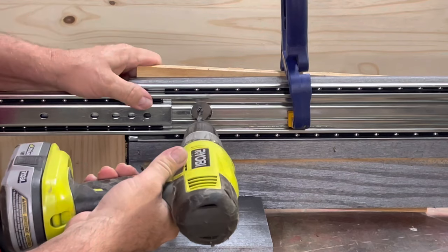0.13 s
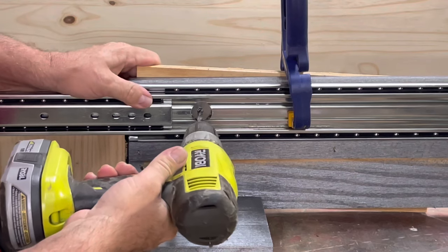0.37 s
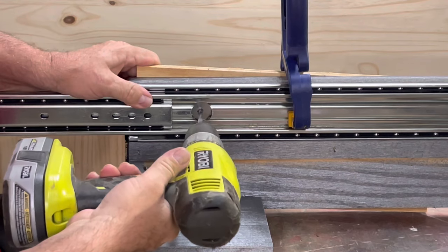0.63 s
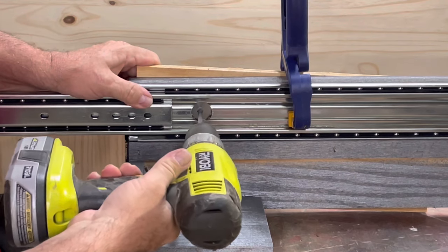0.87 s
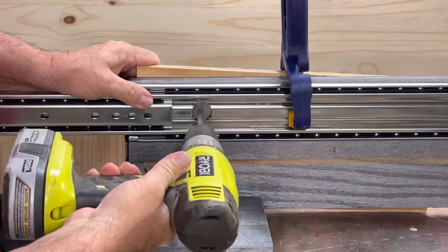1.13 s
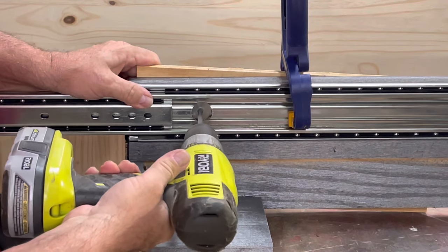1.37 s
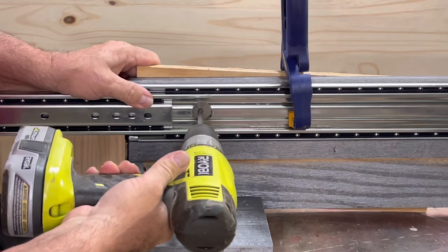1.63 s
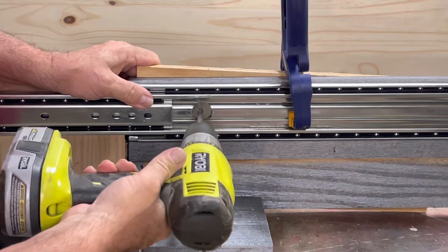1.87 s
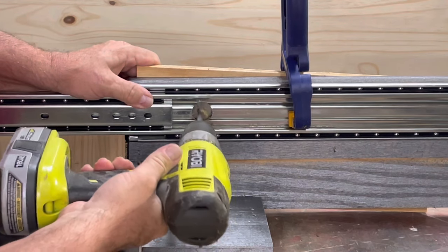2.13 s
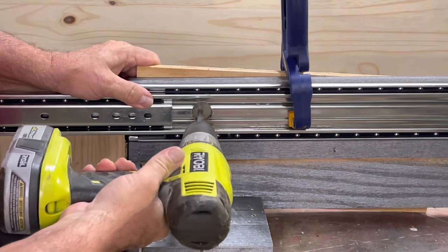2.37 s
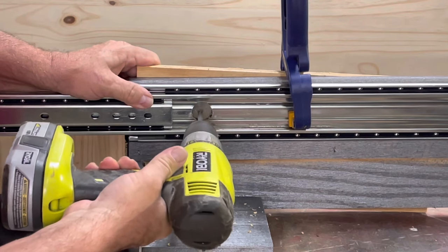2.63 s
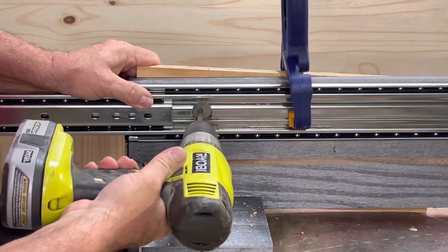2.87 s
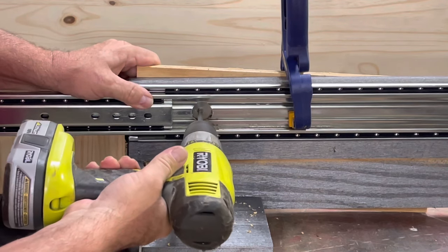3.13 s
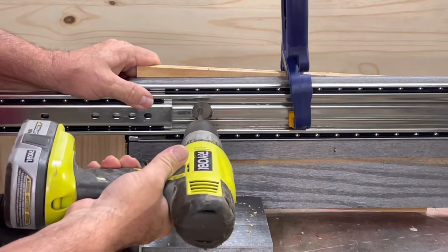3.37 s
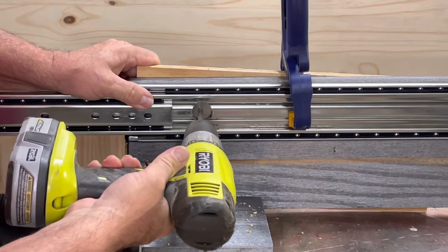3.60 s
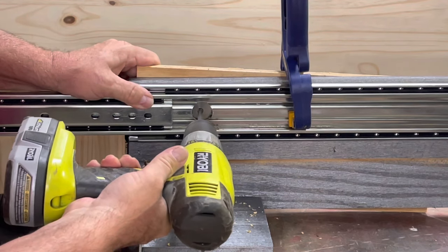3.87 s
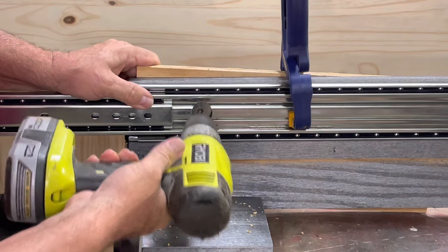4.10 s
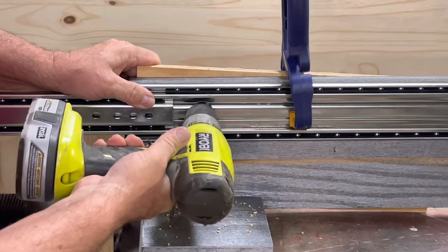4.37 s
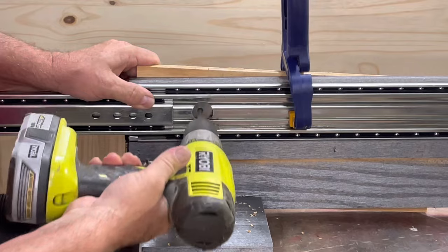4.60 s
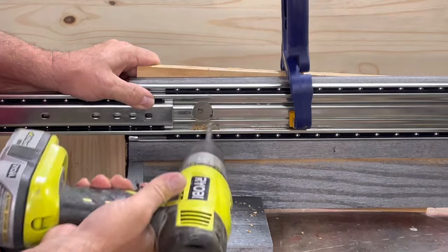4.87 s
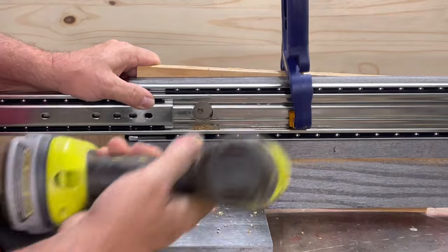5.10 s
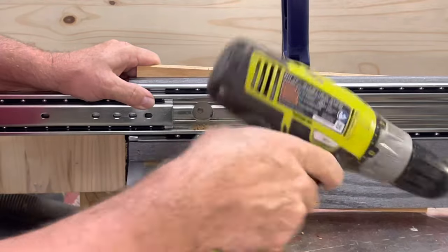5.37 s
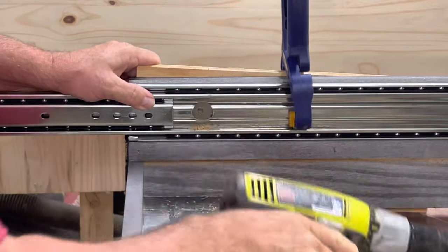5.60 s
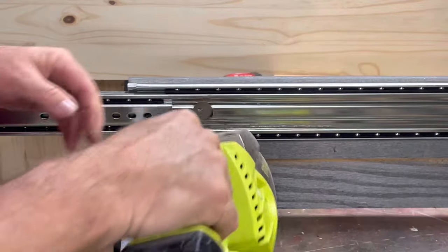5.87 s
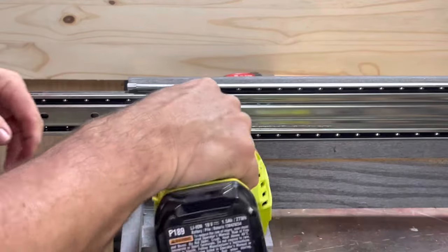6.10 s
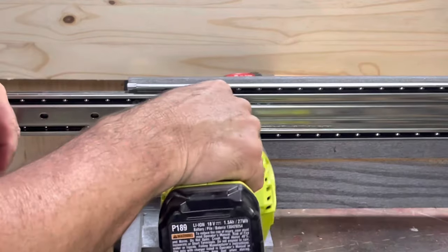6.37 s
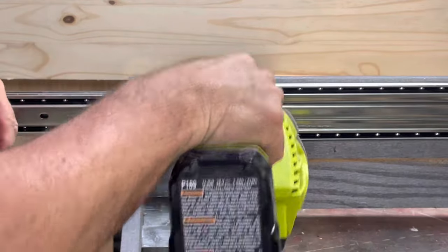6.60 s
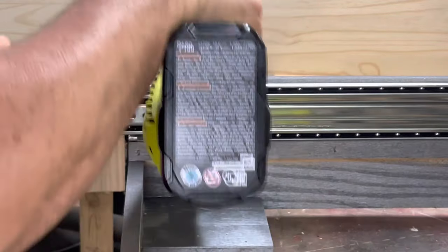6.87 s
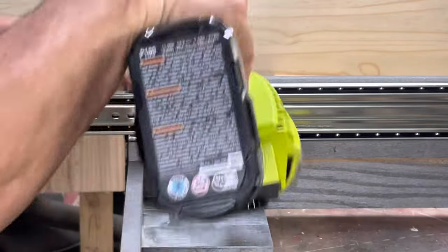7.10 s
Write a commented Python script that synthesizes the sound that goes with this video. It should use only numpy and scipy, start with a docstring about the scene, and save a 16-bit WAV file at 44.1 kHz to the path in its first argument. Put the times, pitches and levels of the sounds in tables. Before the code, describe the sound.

In a small workshop, close to the microphone, a drill bit scrapes and ticks on a loose steel rail. The cordless drill spins up to a high gritty whine, bogs slightly as it bores into wood with metallic knocks, chatters and squeals while backing out, and brakes with a loud clack. After a short quiet pause a handheld blower blasts air with a steady rotor hum and bumps the rail once.

```python
"""A drill bit scrapes into place in a small workshop, over room air and the hum of two far machines.
The cordless drill spins up, bores into wood through a steel rail and is braked to a stop: noise grains ring
housing, board, rail and bench under a motor whine of sines, and short noise bursts make the jolts.
After a quiet pause a hand-held blower, already at speed, clears the chips: shaped noise for its jet, roar
and wind, sines for its rotor and blades. Decaying noise gives the echo of the walls."""
import sys
import numpy as np
from scipy import signal
from scipy.fft import rfft, irfft, next_fast_len
from scipy.io import wavfile

SR = 44100
rng = np.random.default_rng(int(sys.argv[2]) if len(sys.argv) > 2 else 0)


def unload_wav(signal):
    """Save mono or channel-first audio to the path in sys.argv[1] as 16-bit WAV at rate SR, clipped to [-1, 1]."""
    wavfile.write(
        sys.argv[1],
        SR,
        np.round(np.clip(np.atleast_2d(signal).T, -1, 1) * 32767).astype(np.int16),
    )


def volts(x):
    """Linear amplitude factor 10**(x/20) for a level x in dB, scalar or array-like."""
    e = np.asarray(x, float) / 20
    return 10 ** e


N = 319007  # samples
TIME = np.arange(N) / SR  # s


def rms_one(x):
    """Scale to unit rms."""
    return x / np.sqrt(np.mean(x ** 2) + 1e-20)


def peak_one(x):
    """Scale to unit peak."""
    return x / np.max(np.abs(x))


def in_time(rows):
    """Draw a curve through (s, value) points, at every sample."""
    return np.interp(TIME, *np.transpose(rows))


def ramp(start_s, rise_s):
    """Rise from 0 to 1 in a straight line."""
    return np.clip((TIME - start_s) / rise_s, 0, 1)


def swells(s, length_s, heights):
    """Sum bell-shaped swells; each falls to 1/e at its length from the centre."""
    return sum(h * np.exp(-((TIME - at) / wide) ** 2) for at, wide, h in zip(s, length_s, heights))


def drift(rate_hz):
    """Slow random wander of rms 1: noise through two equal low-pass poles, at one point per 40 samples."""
    r = np.exp(-80 * np.pi * rate_hz / SR)
    noise = rng.standard_normal(N // 40 + 4002)
    slow = signal.lfilter([1], [1, -2 * r, r * r], noise)[4000:]  # skip the settling
    return np.interp(np.arange(N) / 40, np.arange(len(slow)), rms_one(slow))


def grains(per_s, spread_db, smooth):
    """Random contacts of uneven size on a bed of smooth noise."""
    sizes = volts(spread_db * np.minimum(rng.exponential(1, N), 5)) * rng.choice([-1, 1], N)
    contacts = sizes * (rng.random(N) < per_s / SR)
    return rms_one(contacts) + smooth * rng.standard_normal(N)


def coloured(x, spectrum):
    """Give a steady sound a spectrum of (Hz, dB) points, steeply closed outside it; rms 1."""
    hz, db = np.transpose(spectrum)
    size = next_fast_len(N)
    log_hz = np.log(np.arange(size // 2 + 1) * SR / size + 1)
    gain = volts(np.interp(log_hz, np.log(hz), db, left=-90, right=-90))
    return rms_one(irfft(rfft(x, size) * gain, size)[:N])


def resonate(x, modes):
    """Ring (Hz, width Hz, dB) resonances in parallel, signs alternating."""
    out = 0
    for k, (hz, width_hz, db) in enumerate(modes):
        r = np.exp(-np.pi * width_hz / SR)
        top = [(1 - r * r) / 2, 0, (r * r - 1) / 2]
        bottom = [1, -2 * r * np.cos(2 * np.pi * hz / SR), r * r]
        out = out + (-1) ** k * volts(db) * signal.lfilter(top, bottom, x + 1e-18)
    return out


def tone(hz, waver_db):
    """A sine of rms 1 before its level wavers, following a pitch from a random phase."""
    turns = np.cumsum(hz + 0 * TIME) / SR + rng.random()
    return np.sqrt(2) * volts(waver_db * drift(19)) * np.sin(2 * np.pi * turns)


# Spectrum of the room air. Each row: frequency in Hz, relative level in dB.
ROOM_AIR = [(20, -3.5), (40, -7), (120, -22.5), (300, -30), (1200, -33.5), (3000, -42), (10500, -51.5)]
# Hum of the far machines once the trigger is pulled. Each row: pitch in Hz, level in dB.
HUM = [(247.6, -72.5), (360.7, -75.5), (748.3, -76), (1427, -83)]


def workshop():
    """Room air as shaped noise, and far machines as steady tones whose level wavers."""
    air = volts(-58) * coloured(rng.standard_normal(N), ROOM_AIR)
    hum = sum(volts(db) * tone(hz, 1.7) for hz, db in HUM)
    early_db = 4 * (TIME < 0.504)  # a little louder before the trigger
    return (air + hum) * volts(early_db)


def walls(x):
    """Dense reflections that set in after a few ms and die away, the treble sooner."""
    low_t60_s, treble_t60_s, split_hz = 0.45, 0.36, 2000
    after = np.arange(SR // 2) / SR
    decay = volts(-60 * after / [[low_t60_s], [treble_t60_s]]) * (after > .006)
    low, high = rng.standard_normal((2, len(after))) * decay
    low = signal.sosfilt(signal.butter(2, [150, split_hz], "band", fs=SR, output="sos"), low)
    high = signal.sosfilt(signal.butter(2, split_hz, "high", fs=SR, output="sos"), high)
    echoes = low + volts(-1.5) * high
    return signal.fftconvolve(x, echoes / np.sqrt(np.sum(echoes ** 2)))[:N]


# Bench resonances, also under jolts and drill. Each row: pitch in Hz, width in Hz, relative level in dB.
BENCH = [(56, 50, 0.5), (91, 36.4, 8.1), (110.8, 60.5, 2.9)]
# The loose rail under the dragged bit. Each row: pitch in Hz, width in Hz, relative level in dB.
LOOSE_RAIL = [(523, 110, -3.5), (810, 98, -2.5), (1226, 77, 2.5), (2840, 900, -15), (7700, 1000, -34.5)]
# The bit dragged into place. Each row: start in seconds, length in seconds, stroke level in dB.
DRAGS = [(0.0033, 0.02, -41.5), (0.0, 0.18, -41), (0.5, 0.041, -58.5)]


def scrape():
    """Dense small slips of steel on steel, throbbing in the loose rail, rumbling in the bench."""
    dies_db_per_s = 332.5
    slip_s, first_slip_s, swing_db = .041, .021, 1  # the drag sticks and slips
    stroke = sum(ramp(s, .004) * volts(db - dies_db_per_s * np.clip(TIME - s - length_s, 0, .3))
                 for s, length_s, db in DRAGS)
    throb = volts(swing_db * np.cos(2 * np.pi * (TIME - first_slip_s) / slip_s))
    slips = grains(3000, 2.5, 1.2)
    rail = rms_one(resonate(slips, LOOSE_RAIL) + volts(-42.0) * slips)
    rumble = rms_one(resonate(slips, BENCH))
    return stroke * (throb * rail + volts(-10.5) * rumble)


# Resonances shared by jolts and drill: the plastic housing, the wooden board, the steel rail.
# Each row: pitch in Hz, width in Hz, relative level in dB.
HOUSING = [(1229, 214, 3), (1668, 477, -0.5), (2652, 400, -1), (3187, 365, -1), (3760, 360, -0.5),
           (4330, 910, -14.5)]
BOARD = [(216, 79, -4), (474, 186, -0.5), (623, 88, 0.5), (790, 143, -4)]
RAIL = [(1023, 86, 1.5), (1240, 180, -4), (2830, 140, -9.5)]
# Jolts of the tool: bit set down, trigger, clutch, bit catching, brake, nozzle bump.
# Each row: start in seconds, crack peak in dB, thud in dB against the crack, share ringing the rail (0-1).
JOLTS = [(.013, -29, -9, .5), (.0205, -26, -12, .4), (.516, -33, -20, .1), (.5685, -13, -10, .4),
         (1.908, -11, -14, .85), (2.158, -11, -11, .9), (2.677, -10, -10, .4), (2.683, -10, -8, .6),
         (2.686, -8, -10, .4), (4.128, -11, 0, .5), (4.158, -16, 3, .2), (4.303, -13, -18, .93),
         (4.968, -6, -9, .05), (4.9755, -9, -20, 0), (4.9785, -8, -20, 0), (6.924, -12, -2, .85)]


def jolts():
    """Each jolt is a short rattle that rings housing and rail, with a thud in board and bench."""
    out, size = np.zeros(N), 4000
    after = np.arange(size) / SR
    push = np.exp(-after / .0002)
    thud = peak_one(resonate(push, BOARD) + volts(-12) * resonate(push, BENCH))
    soft_contact = signal.butter(2, 3200, fs=SR, output="sos")  # plastic and steel meet softly
    for (s, db, thud_db, rail), noise in zip(JOLTS, rng.standard_normal((len(JOLTS), size))):
        rattle = signal.sosfilt(soft_contact, noise * np.exp(-after / .0005))
        rail = np.clip(rail, 0, 1)
        housing_ring = peak_one(resonate(rattle, HOUSING) + volts(-13) * rattle)
        rail_ring = peak_one(resonate(rattle, RAIL))
        crack = peak_one((1 - rail) * housing_ring + rail * rail_ring)
        at = round(s * SR)
        out[at:at + size] += volts(db) * (crack + volts(thud_db) * thud)
    return out


# Spectra of the air jet and of the roar below it. Each row: frequency in Hz, relative level in dB.
JET = [(1150, -9.5), (1480, -1.5), (1900, -11.5), (2200, -10), (2500, -16.5), (2800, -8), (3200, -6.5),
       (3500, -14.5), (4500, -16.5), (5100, -26), (6400, -23), (6750, -19.5), (7100, -28.5), (7800, -32),
       (10500, -42.5)]
ROAR = [(120, -28), (450, -3), (600, -3), (930, 2.5), (1300, -13)]
# Rotor tones. Each row: multiple of the rotor's turning rate, level in dB against the jet.
FAN_ORDERS = [(1, -8.5), (2, -11.5), (3, -14.5), (4, -15.5), (5, -14.5), (6, -21), (7, -23), (8, -26),
              (10, -30), (12, -28), (18, -43.5)]
# Air pockets along the rail. Each row: pitch in Hz, width in Hz, relative level in dB.
POCKETS = [(784, 64, 2.5), (940, 110, -4), (1490, 140, -2.5)]
# The nozzle sweeps nearer and further. Each row: time in seconds, gain in dB.
SWEEP = [(5.76, 1), (5.82, 0), (6.15, 2.5), (6.36, 0.1), (6.69, 1.5), (6.9, 0.5), (6.99, -1.5), (7.23, 0)]
# The blade tone swells as the nozzle turns.
# Each row: centre in seconds, length in seconds, level in dB of what is added to the resting tone.
BLADE_SWELLS = [(5.87, 0.065, -35.5), (6.095, 0.088, -36.5), (6.774, .11, -31), (7.24, 0.094, -38)]
# Gusts on the microphone. Each row: peak time in seconds, level in dB of what is added to the resting wind.
GUSTS = [(6.33, -40)]


def blower():
    """A turbulent jet and roar, the rotor's tones, the blade tone, and wind on the microphone."""
    fan_hz, blades = 482.2, 9
    jet_db, roar_db, pockets_db = -25.5, -25, -29
    blade_rest_db, wind_rest_db = -42.5, -61
    gust_rise_db_per_s, gust_dies_db_per_s = 170, 65
    turning = fan_hz * (1 + 0.000508 * drift(2.7))
    jet = coloured(grains(5000, 2.5, 1.5), JET) * volts(.8 * drift(25))
    roar = coloured(rng.standard_normal(N), ROAR) * volts(0.33 * drift(25))
    rotor = sum(volts(db) * tone(k * turning, .9) for k, db in FAN_ORDERS)
    # the pockets sound on and off under the jet
    pockets = rms_one(sum(volts(8 * drift(3)) * resonate(rng.standard_normal(N), [mode]) for mode in POCKETS))
    s, length_s, db = np.transpose(BLADE_SWELLS)
    blade = (volts(blade_rest_db) + swells(s, length_s, volts(db))) * tone(blades * turning, 0.92)
    gusts = volts(wind_rest_db) + sum(
        volts(db - np.maximum(gust_rise_db_per_s * (s - TIME), gust_dies_db_per_s * (TIME - s))) for s, db in GUSTS)
    wind = rms_one(resonate(resonate(rng.standard_normal(N), [(81, 45, 0)]), [(70, 130, 0)]))
    swept = volts(jet_db) * (jet + rotor) + volts(roar_db) * roar + volts(pockets_db) * pockets
    fade_in = ramp(5.737, 0.034)
    return fade_in * (volts(in_time(SWEEP)) * swept + blade + gusts * wind)


FULL_SPEED = 334  # shaft turns per s
LOAD_FROM_S, STOP_S = 1.95, 4.981


def gear_rattle(speed):
    """Tooth contacts ring the housing; each mode flickers, the upper ones wake later with speed."""
    teeth = grains(3000, 3.96, 1.5) * volts(0.95 * drift(30))
    out = 0
    for k, mode in enumerate(HOUSING):
        flicker = volts(0.7 * drift(14.5))
        wake = (speed / FULL_SPEED) ** (0.8 * (k > 1))
        out = out + (-1) ** k * flicker * wake * resonate(teeth, [mode])
    return rms_one(out)


def wood_cutting():
    """The flutes cut the board: uneven contacts through its resonances and one broad band."""
    return rms_one(resonate(resonate(grains(900, 3.1, 1.09), BOARD), [(523, 1620, 0)]))


def rail_chatter():
    """The bit chatters on the steel rail with a restless level."""
    return rms_one(resonate(grains(900, 2.6, 1.3) * volts(1.8 * drift(30)), RAIL))


def bench_shake(speed):
    """The bench rumbles as resonant noise; out of the hole the chuck's wobble shakes it at one pitch."""
    run_free_s, turns_per_wobble = 4.62, 5.85
    rumble = rms_one(resonate(resonate(rng.standard_normal(N), BENCH), [(87.2, 170, 0)]))
    wobble = tone(speed / turns_per_wobble, 1.5)
    return np.where(TIME > run_free_s, 0.45 * rumble + 0.9 * wobble, rumble)


# The top rail mode squeals against the bit.
# Each row: centre in seconds, length in seconds, height in dB.
SQUEALS = [(4.195, .015, -23.5), (4.264, 0.011, -27), (4.385, 0.022, -28), (4.447, .02, -27.5)]


def rail_squeal(eddies):
    """Grainy noise rung twice through the top rail mode, in brief swells."""
    s, length_s, db = np.transpose(SQUEALS)
    ring = rms_one(resonate(resonate(eddies, RAIL[-1:]), RAIL[-1:]))
    return swells(s, length_s, volts(db)) * ring


# Multiples of the shaft's turning rate that sound in the whine, one number each.
ORDERS_OF_SHAFT = [1, 2, 5, 5.79, 8.87, 10, 12, 13, 15, 20, 21, 25, 26]
# Level of each of these orders at full speed, in the same sequence.
# Each row: dB running light, dB under load, both against the gear level.
WHINE = [(-14, -17), (-17, -14.5), (-12, -19.5), (-16, -12.5), (-37, -13), (-18, -16.5), (-24, -14.5),
         (-26, -28.5), (-30, -27), (-31, -36), (-27.5, -29.5), (-29, -28.5), (-48, -29.5)]
# Pitches at which the brush tone is loudest as it sweeps. Each row: pitch in Hz, width in Hz, boost in dB.
BRUSH_PEAKS = [(2170, 110, 5), (3550, 300, 3)]


def motor_whine(speed):
    """Sines at shaft orders; the starting current makes the brushes sing, the rest comes with speed."""
    commutator_bars, load_to_s = 12, 4.4
    load = np.clip(np.minimum(TIME - LOAD_FROM_S, load_to_s - TIME) / 0.26, 0, 1)
    slow = np.clip(1 - speed / FULL_SPEED, 0, 1)
    starting = np.tanh(slow / .035) * (TIME < LOAD_FROM_S)
    brush_db = sum(db * np.exp(-((commutator_bars * speed - hz) / width_hz) ** 2)
                   for hz, width_hz, db in BRUSH_PEAKS)
    whine = 0
    for k, (light_db, load_db) in zip(ORDERS_OF_SHAFT, WHINE):
        if k == commutator_bars:
            spin_up_db = (16.5 + brush_db) * starting
        elif commutator_bars < k < 16:
            spin_up_db = 9 * starting
        else:
            spin_up_db = -17 * slow
        level = volts(light_db + load * (load_db - light_db) + spin_up_db)
        whine = whine + level * tone(k * speed, 2.2 - 1.7 * starting)
    return whine


# Moments when the work noise changes: wood, chatter and bench swell or sink.
# Each row: centre in seconds, length in seconds, change in dB of wood, of chatter, of bench.
WORK_CHANGES = [(1.1, 0.16, -1.5, 1.5, -3), (1.94, 0.04, 2.5, 4, 11), (2.17, 0.077, 0.5, 3.5, 5),
                (2.377, 0.051, 1.5, 11, 3.5), (2.707, 0.12, 1.5, 4, 5), (3.214, 0.62, 0.7, 3.5, 4.5),
                (4.14, 0.036, 3.5, -9, 9), (4.293, 0.017, 1.5, 10, 8.5), (4.472, 0.15, 4.5, 15.5, 10),
                (4.75, 0.1, 2.7, 2, 11.5)]
# After a hard catch the level dips and recovers. # Each row: start in seconds, dip in dB.
LEVEL_DIPS = [(1.93, 2.5), (2.19, 0.5), (2.43, 1), (2.694, 6.5), (4.317, 3.5)]


def work_levels(speed):
    """Levels in dB of gears, wood, chatter and bench, from speed, changes, dips, backing out and brake."""
    speed_db = 20 * np.log10(speed / FULL_SPEED)
    s, length_s, *changes = np.transpose(WORK_CHANGES)
    wood, chatter, bench = (swells(s, length_s, db) for db in changes)
    fall_s, return_s = 0.0067, 0.34
    dips = sum(db * ramp(s, fall_s) * np.exp(-np.maximum(TIME - s, 0) / return_s) for s, db in LEVEL_DIPS)
    # drawn out of the hole the work grows quieter, from 4.24 s at 5.5 dB per s
    shared = -5.5 * np.maximum(TIME - 4.24, 0) - dips
    brake_s = 0.018  # the brake grips just before the stop
    brake = ramp(STOP_S - brake_s, brake_s)
    # level in dB at full speed, then the power of the speed it grows with
    return (-22 + 1.37 * speed_db + shared + 7.5 * brake,
            -27 + 1.42 * speed_db + shared + wood + 5.5 * brake,
            -33 + 2 * speed_db + shared + chatter,
            -41 + 2.8 * speed_db + shared + bench)


# Spectrum of the motor's cooling air. Each row: frequency in Hz, relative level in dB.
COOLING_AIR = [(4000, -29.5), (4400, -6), (5600, -0.5), (7000, -4.5), (10500, -10.5)]
# The motor shaft before it hunts. Each row: time in seconds, turns per second.
SPEED = [(0.56, 98.0), (0.62, 137.0), (0.73, 179.0), (0.86, 220.5), (0.96, 312.0), (1.05, 326.4),
         (1.25, 334.4), (1.87, 334.0), (1.95, 322.1), (2.1, 328.2), (2.2, 320.0), (2.29, 324.8),
         (2.44, 318.8), (2.53, 322.7), (2.72, 311.6), (2.96, 321.1), (3.11, 320.0), (3.23, 313.4),
         (3.49, 312.9), (3.62, 319.9), (4.05, 318.5), (4.19, 313.4), (4.36, 324.3), (4.8, 333.9)]


def drill():
    """Gears, whine and cooling air share one level; wood, chatter, bench and squeal join; all die at the stop."""
    speed = in_time(SPEED) * (1 + 0.0012 * drift(17.7))  # the shaft hunts a little
    gear_db, wood_db, chatter_db, bench_db = work_levels(speed)
    stop_dies_s = 0.0085
    gate = ramp(0.504, 0.034) * np.exp(-np.maximum(TIME - STOP_S, 0) / stop_dies_s)
    eddies = grains(6000, 3.3, 1.2)
    air = volts(-15.5) * coloured(eddies, COOLING_AIR)
    motor = volts(-0.28) * gear_rattle(speed) + motor_whine(speed) + air
    return gate * (volts(gear_db) * motor + volts(wood_db) * wood_cutting() + volts(chatter_db) * rail_chatter()
                   + volts(bench_db) * bench_shake(speed) + rail_squeal(eddies))


def scene():
    """Tools close by, their echo from the walls, the room behind."""
    tools = drill() + jolts() + scrape() + blower()
    return (tools + volts(-18) * walls(tools) + workshop())[None]


def band_limit(x):
    """A steep low-pass at the top of the band."""
    return signal.sosfilt(signal.butter(12, 10900, fs=SR, output="sos"), x)


def record(dry):
    """A steep elliptic low-pass cuts the top."""
    mix = signal.sosfilt(signal.ellip(10, .3, 65, 10150, fs=SR, output="sos"), dry)
    return band_limit(mix)


dry = scene()
out = record(dry)
unload_wav(out)
```